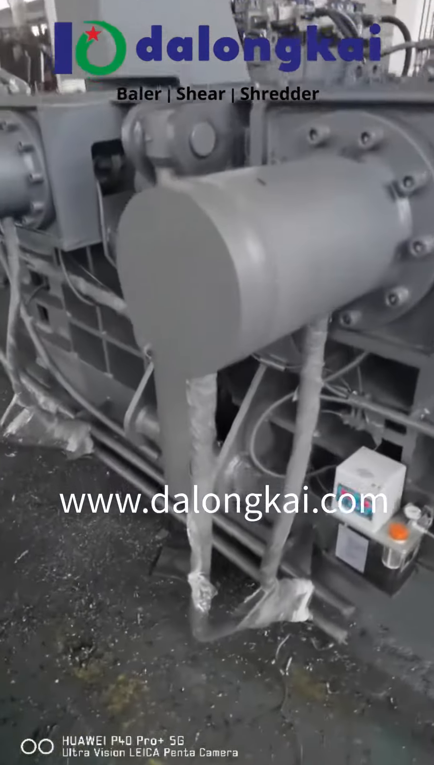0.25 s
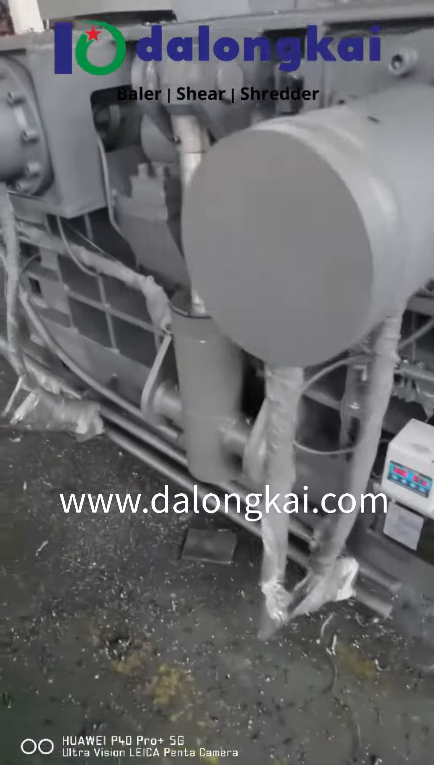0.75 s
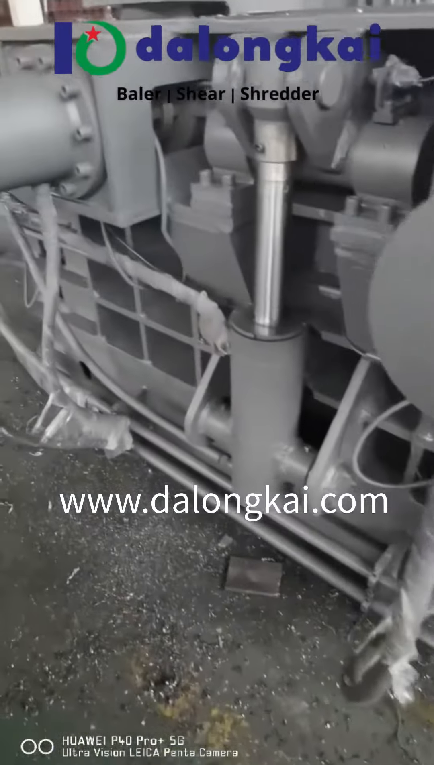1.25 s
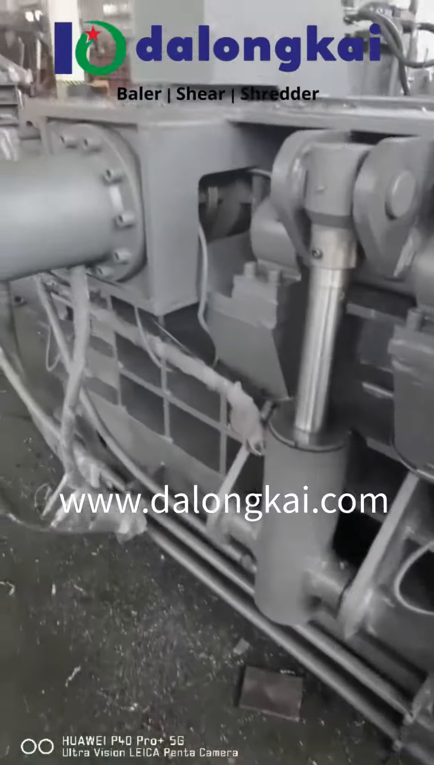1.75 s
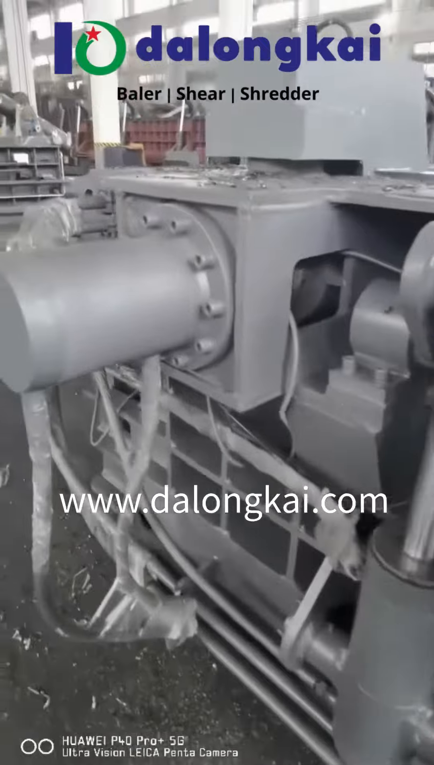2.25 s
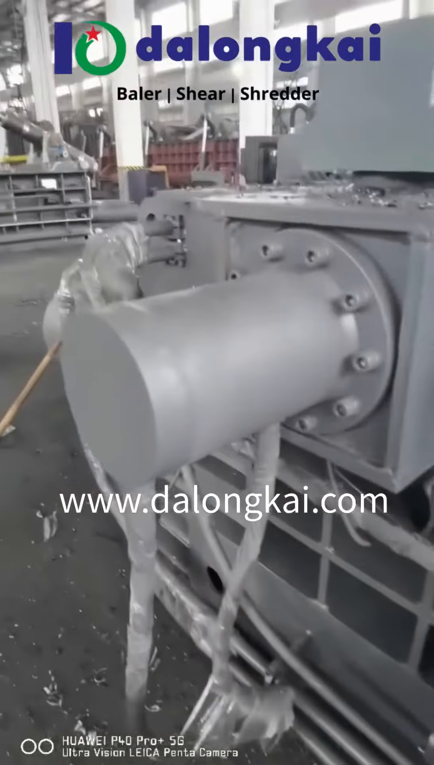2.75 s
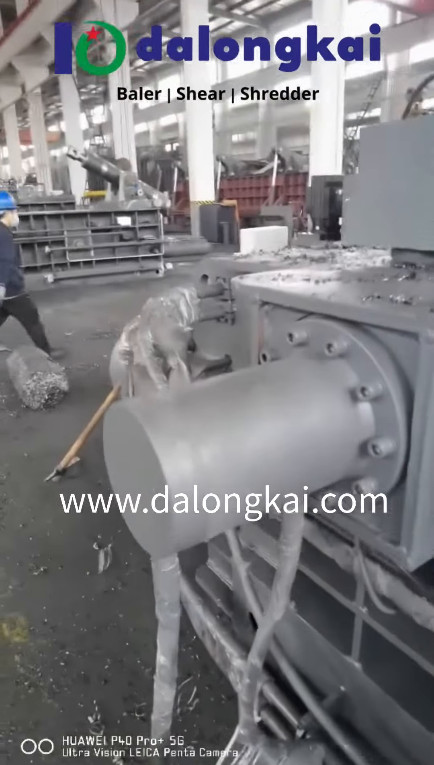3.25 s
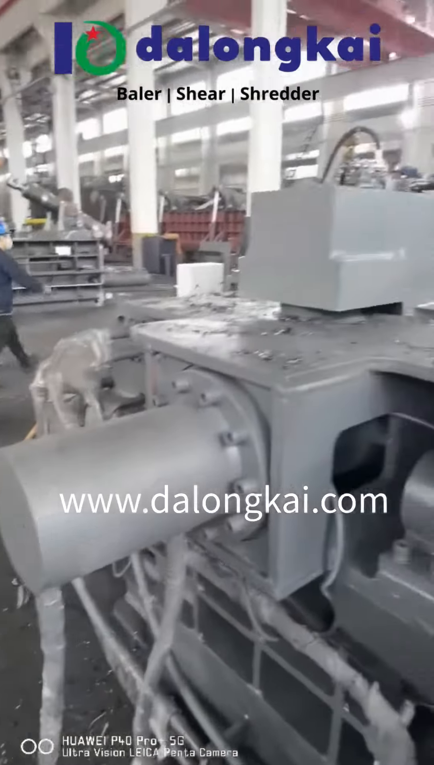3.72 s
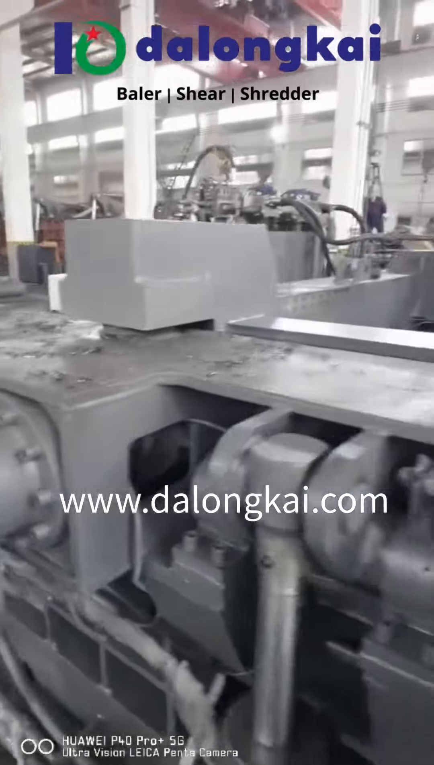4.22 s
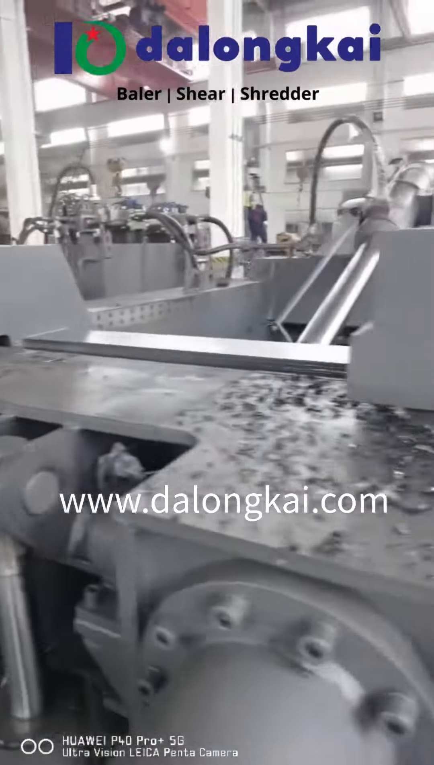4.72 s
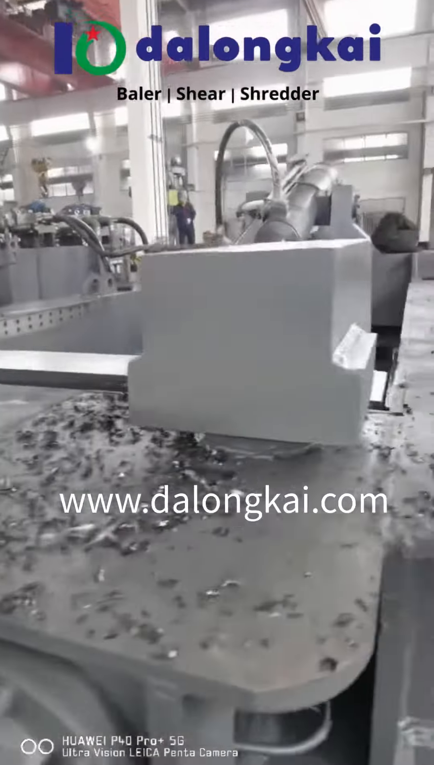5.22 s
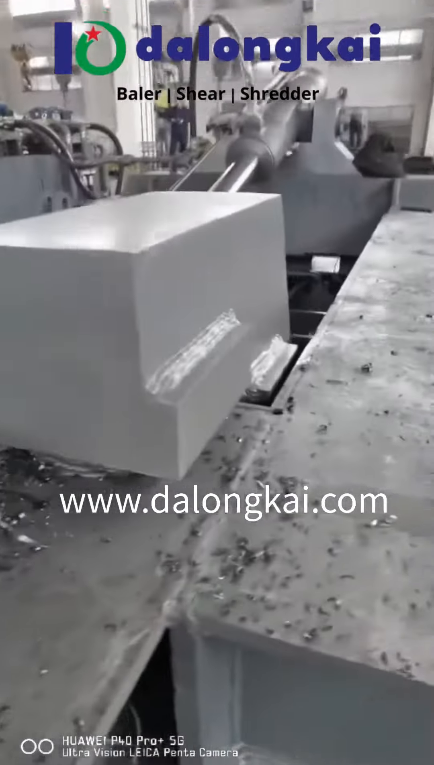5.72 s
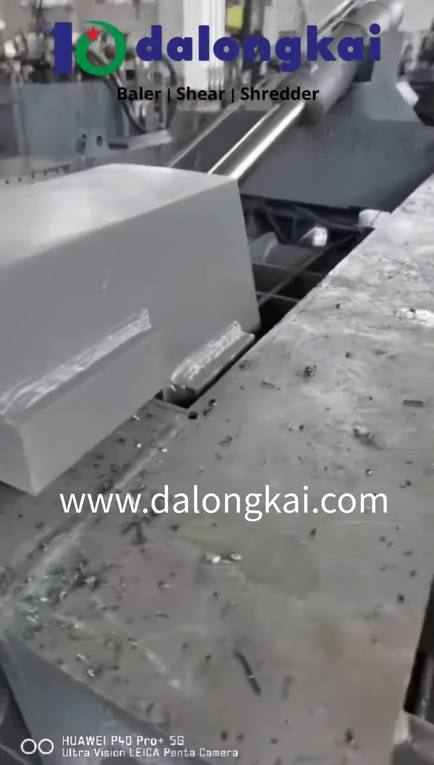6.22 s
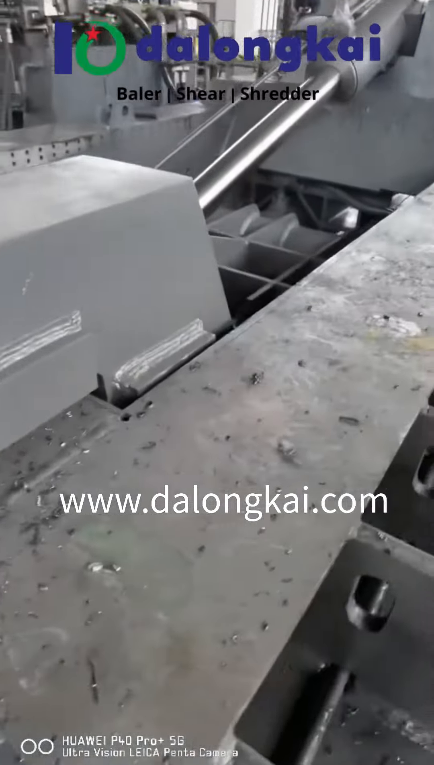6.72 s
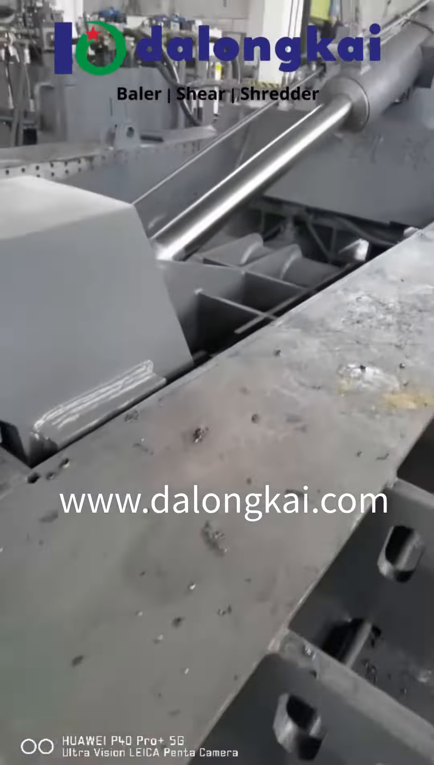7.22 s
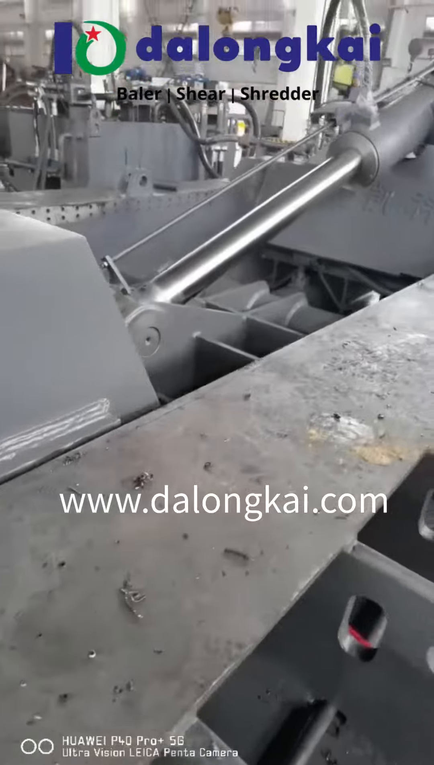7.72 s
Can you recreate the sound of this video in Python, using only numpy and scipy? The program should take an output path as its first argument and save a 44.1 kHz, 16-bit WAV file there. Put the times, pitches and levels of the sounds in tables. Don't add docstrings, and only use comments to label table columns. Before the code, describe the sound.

A hydraulic pump whines at one steady low-mid pitch, swelling and fading in a large factory hall, with faint air hiss and metal ticks.

```python
import sys
import numpy as np
from scipy import signal
from scipy.fft import rfft, irfft
from scipy.io import wavfile
from scipy.ndimage import uniform_filter1d

SR = 44100
rng = np.random.default_rng(int(sys.argv[2]) if len(sys.argv) > 2 else 0)


def generate_wav(signal):
    frames = np.transpose(np.atleast_2d(signal))
    scaled = np.clip(frames, -1, 1) * 32767
    pcm = np.round(scaled).astype(np.int16)
    wavfile.write(sys.argv[1], SR, pcm)


def convert_level_to_amplitude(level_db):
    exponent = np.asarray(level_db, float) / 20
    return 10 ** exponent


N = 351477
PISTON_HZ, PISTONS = 286.65, 9

# time in seconds, level in dB.
WHINE_WALK = [(0, -9.5), (.27, -8), (.55, -11.5), (.8, -27), (1.2, -19.5), (1.6, -12.5), (2.2, -13),
              (2.42, -8.5), (3.4, -8), (3.85, -11.5), (4.05, -9), (4.4, -11.5), (4.9, -7.5), (6.35, -8),
              (6.8, -9), (7.3, -20), (7.8, -26.5), (7.97, -13)]
# centre in seconds, change in dB, length in seconds.
WHINE_CROSSINGS = [(5.154, -5.5, 0.61), (6.013, -8, 0.81), (5.97, -10.5, 0.3), (7.07, -5, 0.57),
                   (7.57, -9, 0.24), (1.15, -3.5, 0.24), (5.5, -1.4, 0.54), (5.82, -1.5, 0.19),
                   (7, 3.5, 0.2), (8.1, 2.5, .2), (1.08, 2.5, 0.17), (2.3, -2, 0.12), (0.065, -2, 0.082),
                   (6.97, -2.5, .16)]
# time in seconds, extra length in metres.
PATH_LENGTH = [(0, 0), (.55, .1), (1, .7), (2.7, 1.35), (4.3, .85), (5.1, .9), (5.85, 1.3), (6.1, 1.8),
               (6.7, 1.85), (7.4, 1.55), (7.65, 2.1), (7.97, 2.3)]
# centre in seconds, multiple, peak in dB, length in seconds.
LOW_SPOTS = [(0.041, 2, -39, 0.56), (0.777, 2, -31.5, 1.02), (1.249, 2, -44.8, 0.14), (1.951, 2, -37, 0.89),
             (2.391, 2, -26, 0.36), (2.759, 2, -45.5, 0.24), (3.366, 2, -44.5, 0.17), (3.676, 2, -40, 0.3),
             (3.869, 2, -39, 0.13), (4.247, 2, -27.5, 1.22), (4.814, 2, -31.4, 0.36),
             (5.145, 2, -37.5, 0.73), (5.604, 2, -25.5, 0.48), (6.157, 2, -36, 0.32), (6.716, 2, -37, 0.88),
             (7.321, 2, -41.3, 0.13), (7.669, 2, -28.0, 1.05), (0.334, 3, -44, 0.27),
             (0.888, 3, -39.5, 0.22), (1.249, 3, -39, 0.52), (1.743, 3, -34, 0.62), (2.084, 3, -28.0, 0.46),
             (3.193, 3, -40.8, 0.43), (3.94, 3, -37.5, 1.8), (4.667, 3, -41, 0.16), (5.225, 3, -36, 0.36),
             (5.551, 3, -49, 0.39), (7.197, 3, -40.5, 1.24), (7.252, 3, -40, 0.14), (7.932, 3, -46.5, 1),
             (0.321, 4, -43.1, 0.35), (2.113, 4, -42, 0.2), (2.315, 4, -41.5, 0.17),
             (2.692, 4, -45.7, 0.57), (3.109, 4, -40.5, 0.52), (3.928, 4, -41, 0.39), (4.593, 4, -41, 0.27),
             (4.837, 4, -39.9, 0.38), (7.243, 4, -47.1, 0.33)]
LOW_BETWEEN_DB = -51, -51.5, -50.5
# frequency in Hz, level in dB.
UPPER_LINES = [(1147, -47), (1432, -45), (1723, -40), (2008, -41), (2293, -43), (2579, -40.5), (2864, -44),
               (3155, -43), (3445, -56.5), (3725, -58.5), (4011, -59.5), (4300, -60), (4592, -57.5),
               (4883, -55.5), (5160, -62.5)]
# centre in seconds, multiple, peak in dB,
# length in seconds.
UPPER_SPOTS = [(0.295, 5, -43, 0.32), (0.674, 5, -38, 0.18), (0.945, 5, -44, 0.12),
               (1.202, 5, -45.1, 0.11), (1.235, 5, -53.5, 2.9), (1.92, 5, -43.5, 0.23),
               (2.054, 5, -34, 0.23), (2.545, 5, -43, 0.26), (3.016, 5, -37.5, 0.92), (3.702, 5, -46, 0.4),
               (4.173, 5, -37, 0.28), (4.383, 5, -40.5, 0.22), (4.594, 5, -41, 0.83),
               (4.945, 5, -40.5, 0.17), (5.066, 5, -47, 0.15), (5.452, 5, -47, 0.15),
               (6.004, 5, -42, 0.12), (6.126, 5, -43.1, 0.11), (6.263, 5, -33, 0.17),
               (6.429, 5, -45, 0.35), (6.731, 5, -38.5, 0.13), (7.382, 5, -39.5, 0.58),
               (7.739, 5, -45, 0.2), (0.289, 7, -42, 0.24), (0.541, 7, -35.5, 0.33),
               (0.834, 7, -39.5, 0.3), (1.087, 7, -41, 0.55), (1.455, 7, -43, 0.18), (1.586, 7, -46, 0.15),
               (2.093, 7, -44, 0.5), (2.159, 7, -39.5, 0.15), (2.309, 7, -38, 0.13), (2.432, 7, -45, 0.12),
               (2.804, 7, -41.5, 0.13), (3.07, 7, -48.5, 0.56), (3.347, 7, -36, 0.23),
               (3.843, 7, -48, 0.24), (4.329, 7, -46, 0.21), (4.505, 7, -48, 0.29), (4.715, 7, -38, 0.1),
               (4.995, 7, -44, 0.09), (5.015, 7, -49, 0.76), (6.224, 7, -42, 0.13), (6.357, 7, -36, 0.2),
               (6.561, 7, -42, 0.1), (6.765, 7, -44.4, 0.24), (7.418, 7, -38.5, 0.49),
               (7.679, 7, -46.0, 0.2),
               (0.956, 8, -42, 0.09), (1.3, 8, -41, 0.8), (1.983, 8, -37, 0.23), (2.369, 8, -31.5, 0.21),
              (2.931, 8, -49.5, 0.37), (3.185, 8, -34.5, 0.49), (3.794, 8, -40, 0.14), (4.38, 8, -43, 0.14),
              (4.539, 8, -44, 1), (4.968, 8, -41, 0.18), (5.108, 8, -43, 0.09), (5.567, 8, -39, 0.12),
              (5.876, 8, -40.5, 0.58), (5.919, 8, -44, 0.14), (6.212, 8, -33, 0.19), (6.41, 8, -43, 0.19),
              (6.806, 8, -41.3, 0.11), (7.213, 8, -48.8, 0.25), (7.437, 8, -41, 0.09),
              (0.673, 9, -41.9, 0.41), (1.12, 9, -46, 0.25), (1.43, 9, -37, 0.15), (1.873, 9, -49, 0.17),
              (2.49, 9, -39.5, 0.14), (3.09, 9, -45, 0.2), (4.604, 9, -41, 0.15), (5.763, 9, -47, 0.088),
              (5.964, 9, -47, 0.29), (7.344, 9, -42, 0.14), (5.803, 9, -44.5, 0.34), (0.54, 10, -45, 0.27),
              (1.26, 10, -37.5, 0.4), (1.578, 10, -36, 0.16), (1.738, 10, -45, 0.24), (2.06, 10, -39, 0.12),
              (2.613, 10, -45, 0.16), (3.196, 10, -43, 0.44), (3.4, 10, -43, 0.15),
              (4.719, 10, -34.5, 0.12), (6.448, 10, -41, 0.11), (6.629, 10, -46, 0.16),
              (6.764, 10, -39, 0.15), (1.862, 11, -46, 0.42), (2.07, 11, -42, 0.078),
              (2.414, 11, -35, 0.057), (3.094, 11, -48.5, 0.64), (3.512, 11, -47.5, 0.26),
              (7.46, 11, -42.5, 0.14)]
# centre in seconds, peak in dB, length in seconds.
SIXTH_LINE_RINGS = [(0.03, -38, 0.14), (0.194, -42, 0.12), (0.342, -30, 0.19), (0.575, -35.5, 0.31),
                    (0.739, -26, 0.17), (0.895, -40, 0.082), (1.07, -37.7, 0.75), (1.227, -42.5, 0.15),
                    (1.407, -36, 0.078), (1.471, -33.5, 0.22), (1.908, -30.9, 0.21), (2.05, -33, 0.11),
                    (2.162, -25, 0.29), (2.496, -40, 0.23), (2.695, -28.5, 0.21), (2.842, -42.6, 0.29),
                    (3.347, -42, 0.12), (3.626, -42, 0.28), (3.923, -40.1, 0.13), (4.078, -46, 0.13),
                    (4.39, -39.5, 0.4), (4.636, -40.5, 0.23), (4.847, -43, 0.21), (4.991, -35, 0.12),
                    (5.134, -43, 0.13), (5.24, -43, 0.072), (5.328, -41, 0.089), (5.528, -42, 0.25),
                    (5.804, -39.5, 0.18), (5.977, -33, 0.16), (6.139, -32, 0.14), (6.277, -38.9, 0.23),
                    (6.423, -31, 0.13), (6.554, -36, 0.12), (6.654, -31.5, 0.19), (6.8, -39, 0.12),
                    (6.85, -47, 0.27), (7.053, -36, 0.23), (7.244, -31.5, 0.33), (7.535, -30, 0.24),
                    (7.666, -47.9, 0.091), (7.886, -33.5, 0.16)]
# centre in seconds, turns of the shaft, peak in dB, length in seconds.
UNEVEN_SWELLS = [(0.42, 8, -33.5, 1.2), (1.32, 8, -41.7, 0.35), (1.53, 8, -37.8, 0.22),
                 (1.76, 8, -36.1, 0.26), (2.2, 8, -31.1, 1.76), (2.25, 8, -35.7, 0.44),
                 (3.48, 8, -35.2, 2.5), (4.45, 8, -37.2, 0.8), (5.21, 8, -42.4, 0.2),
                 (5.41, 8, -36.3, 1.83), (6.33, 8, -40.6, 0.28), (6.55, 8, -42.9, 0.95),
                 (0.3, 10, -38.4, 0.29), (1.04, 10, -41.9, 0.27), (1.2, 10, -34.6, 1.88),
                 (1.74, 10, -43.9, 0.33), (2.61, 10, -34.1, 1.76), (3.02, 10, -39.4, 0.3),
                 (3.66, 10, -30.8, 1.97), (4.43, 10, -39.7, 0.49), (4.7, 10, -38.9, 0.21),
                 (5.45, 10, -32.8, 1.24), (5.83, 10, -41.6, 0.28), (6.29, 10, -41.6, 0.21),
                 (6.62, 10, -39, 1.45), (0.6, 17, -44.5, 1.0), (2.01, 17, -33.7, 0.96),
                 (2.87, 17, -41, 1.9), (3.4, 17, -40.7, 0.52), (3.76, 17, -38.3, 0.63),
                 (4.65, 17, -32.4, 0.79), (5.1, 17, -39.1, 0.53), (5.6, 17, -43.5, 0.58),
                 (6.82, 17, -37.3, 0.89), (7.85, 17, -44, 1.2), (0.07, 19, -36.8, 0.48),
                 (0.74, 19, -37.9, 0.95), (1.72, 19, -39, 0.7), (3.0, 19, -41, 0.6), (7.2, 19, -44, 0.9),
                 (2.35, 19, -38.7, 2.5), (3.71, 19, -36.3, 2.14), (4.53, 19, -40.8, 0.31),
                 (4.87, 19, -42.3, 0.33), (5.37, 19, -39.1, 0.99), (6.14, 19, -38.9, 0.44),
                 (6.63, 19, -46.0, 1.12), (8.05, 19, -51.1, 1.74)]
UNEVEN_TURNS = 8, 10, 17, 19
UNEVEN_BETWEEN_DB = -52, -52, -51, -51
START_IN_STEP = 8, 10
# turns of the shaft, level in dB.
WEAK_SHAFT = [(7, -46.5), (11, -43), (12, -50.5), (13, -47), (14, -52.5), (15, -58), (16, -48), (20, -48),
              (21, -50), (22, -49.5), (23, -63.5), (24, -50.5), (25, -58), (26, -51), (28, -49.5),
              (29, -55), (30, -62.5), (32, -53), (37, -61), (50, -57), (53, -55), (60, -55), (106, -61.5)]
# centre in seconds, turns, peak in dB, length in seconds.
WEAK_SPOTS = [(6.5, 7, -46, 1.11), (1.7, 11, -52, 0.66), (2.7, 11, -51.1, 2.9), (5.432, 11, -43.5, 1.9),
              (3.4, 13, -50.5, 2.5), (5.639, 13, -36, 0.16), (1.373, 16, -44.5, 1.1),
              (2.158, 16, -44, 0.85), (3.091, 16, -41.5, 2.4), (5.1, 16, -41, 0.3), (7, 16, -44.5, 1.4),
              (1.3, 20, -45, 1.2), (1.7, 20, -41, 0.47), (4.688, 20, -45.5, 2.4), (7.904, 20, -38.5, 0.39),
              (1.7, 21, -50, 0.76), (1.932, 21, -39.0, 0.43), (3, 21, -47.6, 1.8), (3.872, 21, -42, 0.36),
              (2.116, 22, -40, 0.27), (2.715, 22, -49, 1.45), (5, 22, -46.5, 0.98)]
# time in seconds, gain in dB.
NEARNESS = [(0, 0.9), (.4, -0.7), (1.4, 0.85), (2.2, 2), (3.2, 0.9), (3.7, 0), (4.7, -0.2), (5.5, 0.16),
            (5.9, -1.5), (6.6, 0.85), (7.2, -0.5), (7.97, 0.3)]
# frequency in Hz, density in dB per Hz.
HISS_SPECTRUM = [(2060, -30), (3500, -6), (3970, -6), (4720, -0.5), (5240, -4.5), (5840, 1.5), (7140, -4.5),
                 (8150, -0.5), (9150, -8.5), (10600, -10.5), (11900, -21), (13800, -27.5)]
# time in seconds, hiss level in dB.
AIR_LEVEL = [(0, -36), (.55, -40.5), (1.3, -37.5), (2.25, -39.5), (2.45, -51), (2.8, -55), (5.5, -55),
             (6, -42), (7.1, -39.5), (7.65, -43), (7.97, -38.5)]
# centre in seconds, rise in dB, length in seconds.
AIR_SPURTS = [
    (1.78, 3.5, 0.21),
    (2.13, 5.5, 0.16),
    (2.59, 7, 0.091),
    (3.32, 4.5, .14),
    (5.23, 5.5, 0.24),
    (6.29, 3.5, 0.1),
]
# start in seconds, peak in dB, lower ring in Hz, upper ring in Hz, upper ring in dB.
CHIP_TICKS = [(0.0396, -14, 5640, 8400, -13), (0.0777, -22.5, 5560, 8100, -5),
              (1.7446, -13.5, 5510, 7930, -10), (1.7575, -23, 5800, 8060, -11),
              (1.7848, -24.5, 6200, 10600, -14), (1.7893, -18, 6040, 9870, -13),
              (2.1294, -22, 6180, 8070, -17), (2.5507, -42, 5000, 11600, 10.5),
              (2.5635, -46, 5200, 11800, 9), (2.5745, -47, 8300, 11700, 8), (2.5702, -44, 8500, 10600, 8),
              (3.299, -36, 5200, 7000, -7), (5.2513, -31, 5500, 8180, -17), (6.0996, -31.5, 6020, 8100, -3),
              (6.134, -27.5, 5840, 7840, 2), (1.499, -30, 5980, 10500, -2), (2.0916, -28, 5980, 10500, -5)]
# frequency in Hz, density in dB per Hz.
ROAR_SPECTRUM = [(20, -30), (60, -15.5), (120, 0), (200, -1.5), (290, 0.5), (370, -7), (470, -8.5),
                 (600, -8.5), (1000, -20), (1280, -24.5), (1500, -19.5), (3000, -19), (3800, -31),
                 (4800, -23), (7000, -46), (14000, -51.5)]
# centre in seconds, change in dB, length in seconds.
ROAR_LULLS = [
    (0.1, -2, 0.5),
    (3.46, -2.5, 0.14),
]


def pistons():
    turns = PISTON_HZ * np.arange(N) / SR
    second_db, third_db, fourth_db = (
        spotted(LOW_SPOTS, k, db, 1.2) for k, db in enumerate(LOW_BETWEEN_DB, start=2))
    second = line(2 * turns, second_db, 0.18, 5.6)
    third = line(3 * turns, third_db, 0.19, 6.3)
    turns = turns - curves(PATH_LENGTH)[0] * PISTON_HZ / 343
    first = line(turns, whine_db(), 0.038, 8.7, free=False)
    fourth = line(4 * turns, fourth_db, 0.26, 4.7)
    return first + second + third + fourth


def whine_db():
    return uniform_filter1d(curves(WHINE_WALK)[0], size=3000) + crossing(WHINE_CROSSINGS)


def standing():
    db = uniform_filter1d(whine_db(), size=20000)
    return db - db.mean()


def casing():
    turns = PISTON_HZ * np.arange(N) / SR
    sixth = [(s, 6, db, length) for s, db, length in SIXTH_LINE_RINGS]
    spots = UPPER_SPOTS + sixth
    near_db = 0.92 * curves(NEARNESS)[0]
    out = 0
    for hz, db in UPPER_LINES[1:]:
        k = round(hz / PISTON_HZ)
        once_a_turn = np.exp(2j * np.pi * turns / PISTONS)
        throb = 1 + 0.22 * (fading(4.0) * once_a_turn).real
        if k > 11:
            tone = line(k * turns, db + 3.0 + near_db, 0.99, 2.9 + 0.54 * k)
        else:
            shifted = k * turns + 0.1 * k * fading(.35).real
            level_db = spotted(spots, k, db - 5 + near_db, 3.5)
            tone = line(shifted, level_db, .33, 11.0)
        out = out + throb * tone
    return out


def shaft():
    turns = PISTON_HZ / PISTONS * np.arange(N) / SR
    near_db = 2.4 * curves(NEARNESS)[0]
    out = 0
    for k, db in zip(UNEVEN_TURNS, UNEVEN_BETWEEN_DB):
        level_db = spotted(UNEVEN_SWELLS, k, db + near_db, 0.56)
        out = out + line(k * turns, level_db, 0.15, 3.0, free=k not in START_IN_STEP)
    for k, db in WEAK_SHAFT:
        k = round(k)
        level_db = spotted(WEAK_SPOTS, k, db - 3.5 + near_db, .8)
        out = out + line(k * turns, level_db, .3, 3.6)
    return out


def chips():
    out, t = np.zeros(N + 4000), np.arange(4000) / SR
    band = signal.butter(2, [4500, 11000], "bandpass", fs=SR)
    for s, db, low_hz, high_hz, high_db in CHIP_TICKS:
        ring = np.sin(2 * np.pi * low_hz * t) + convert_level_to_amplitude(high_db + 5.0) * np.sin(2 * np.pi * high_hz * t)
        fuzz = .9 + .35 * evened(uniform_filter1d(rng.standard_normal(4000), size=55))
        echo_decay = convert_level_to_amplitude(-8.0 - 60 * t / 0.046) + convert_level_to_amplitude(-21.5 - 60 * t / 0.23)
        puff = signal.lfilter(*band, rng.standard_normal(4000)) * echo_decay
        rise = 1 - np.exp(-t / 0.00066)
        tick = rise * (ring * fuzz * convert_level_to_amplitude(-60 * t / 0.02) + puff)
        out[round(s * SR):][:4000] += convert_level_to_amplitude(db - 1.5) * tick
    return out[:N]


def air_tool():
    hz = np.fft.rfftfreq(1024, 1 / SR)[:, None]
    level_db = curves(AIR_LEVEL)[0] + crossing(AIR_SPURTS)
    tilt = 2.2 + 0.4632 * (level_db + 37)
    tilt = np.pad(tilt[::256], (0, 9), "edge")[:N // 256 + 5]
    tilt_db = tilt * np.log2(np.maximum(hz, 3500) / 8000)
    frame_s = np.arange(len(tilt)) * 256 / SR
    wash_db = 7.5 * np.exp(-((hz - 5700) / 600) ** 2 - frame_s / .6)
    hiss = noise(read(HISS_SPECTRUM, hz) + tilt_db + wash_db, 1.8, 0.6)
    t = np.arange(N) / SR
    whistle = line(5630 * t, -31.5 - 111 * t, 0.96, 330)
    return convert_level_to_amplitude(level_db + 4.0) * hiss + whistle


def roar():
    hz = np.fft.rfftfreq(N, 1 / SR)
    comb_db = 2.3 * np.cos(2 * np.pi * hz / PISTON_HZ) * np.clip(hz / 700 - 1, 0, 1)
    bed = rfft(noise(0, 2.7, 0.38)) * convert_level_to_amplitude(read(ROAR_SPECTRUM, hz) + comb_db)
    low = 1 / (1 + (hz / 220) ** 4)
    rumble = evened(irfft(bed * low, N))
    rest = evened(irfft(bed * (1 - low), N))
    deep = irfft(rfft(rumble) / (1 + (hz / 85.5) ** 4), N)
    rumble = rumble + deep * (convert_level_to_amplitude(1.6 * (np.arange(N) / SR - 4.5)) - 1)
    rumble_db = -42.5 + .27 * standing()
    rest_db = -33 + curves(NEARNESS)[0] + crossing(ROAR_LULLS)
    return convert_level_to_amplitude(rumble_db) * rumble + convert_level_to_amplitude(rest_db) * rest


def line(turns, db, blur, width_hz, free=True):
    blur = np.clip(blur, 0, 1)
    gain = np.sqrt(1 - blur ** 2) + blur * fading(width_hz)
    start = free * rng.random()
    return np.sqrt(2) * convert_level_to_amplitude(db) * (gain * np.exp(2j * np.pi * (turns + start))).real


def fading(width_hz):
    hz = np.fft.fftfreq(N // 100 + 2, 100 / SR)
    z = rng.standard_normal((len(hz), 2)) @ [1, 1j]
    slow = evened(np.fft.ifft(z / (1 + (hz / width_hz) ** 2) ** 0.69))
    return np.interp(np.arange(N) / 100, np.arange(len(hz)), slow)


def spotted(rows, multiple, between_db, drift_hz):
    spots = [(s, convert_level_to_amplitude(db), length) for s, k, db, length in rows if round(k) == multiple]
    bed = convert_level_to_amplitude(between_db) * abs(fading(drift_hz))
    return 20 * np.log10(bed + crossing(spots) + 1e-9)


def crossing(rows):
    out = np.zeros(N)
    for s, height, length in rows:
        first = max(round((s - length / 2) * SR), 0)
        last = min(round((s + length / 2) * SR), N)
        at = np.arange(first, last)
        out[at] += height * np.cos(np.pi * (at / SR - s) / length) ** 2
    return out


def noise(spectrum_db, patchy_db, flicker_db):
    frames = N // 256 + 5
    a, b, patches = rng.standard_normal((frames, 513, 3)).T
    patches = uniform_filter1d(patches, size=8, axis=0)
    patches = evened(uniform_filter1d(patches, size=12, axis=1))
    flicker = rng.standard_normal(frames)
    z = (a + 1j * b) * convert_level_to_amplitude(spectrum_db + patchy_db * patches + flicker_db * flicker)
    return evened(signal.istft(z, nperseg=1024, noverlap=768)[1][:N])


def evened(x):
    return x / np.sqrt(np.mean(abs(x) ** 2) + 1e-20)


def read(points, hz):
    f, value = np.transpose(points)
    return np.interp(np.log(hz + 1), np.log(f + 1), value)


def curves(rows):
    s, *columns = np.transpose(rows)
    return [np.interp(np.arange(N) / SR, s, c) for c in columns]


def scene():
    return (pistons() + casing() + shaft() + roar() + air_tool() + chips())[None]


def low_pass(x):
    return signal.sosfilt(signal.butter(12, 13990, fs=SR, output="sos"), x)


def record(dry):
    return low_pass(dry)


dry = scene()
out = record(dry)
generate_wav(out)
```